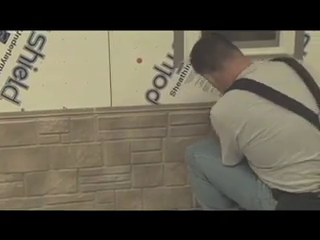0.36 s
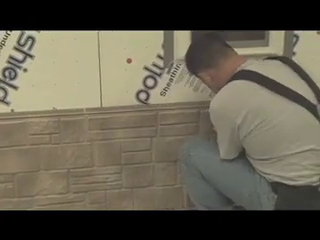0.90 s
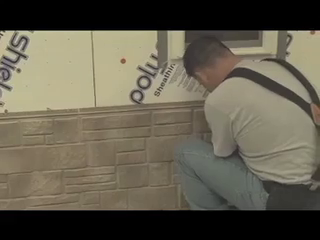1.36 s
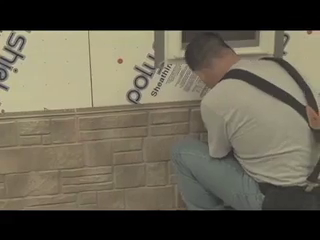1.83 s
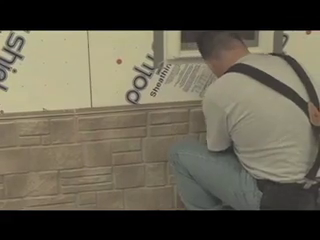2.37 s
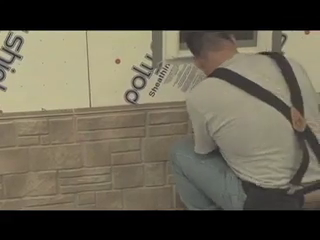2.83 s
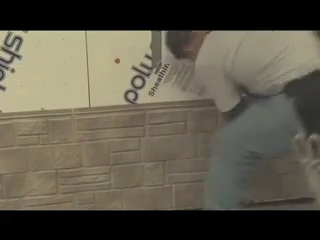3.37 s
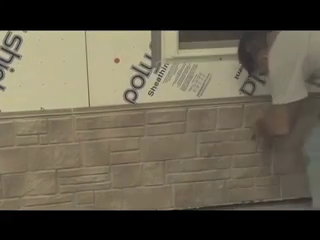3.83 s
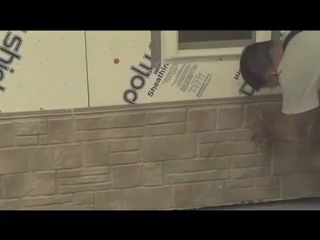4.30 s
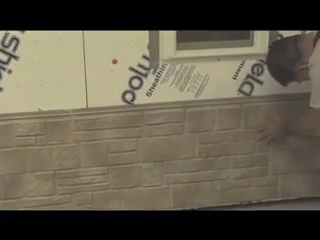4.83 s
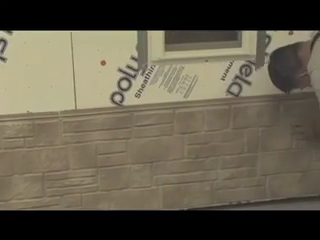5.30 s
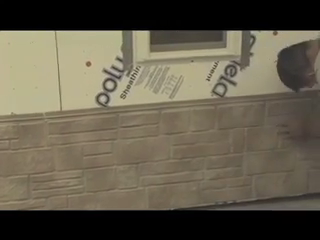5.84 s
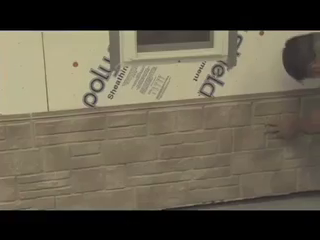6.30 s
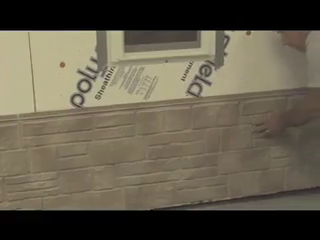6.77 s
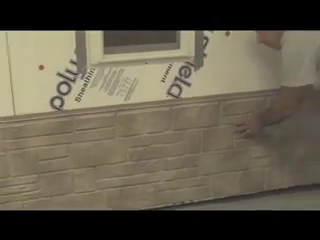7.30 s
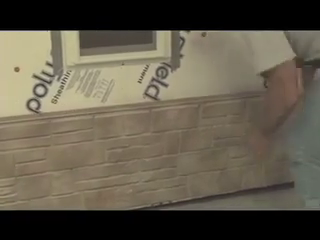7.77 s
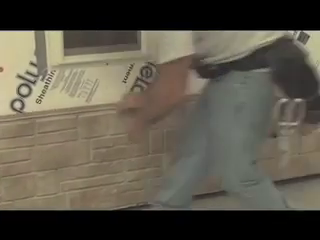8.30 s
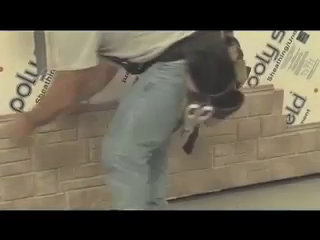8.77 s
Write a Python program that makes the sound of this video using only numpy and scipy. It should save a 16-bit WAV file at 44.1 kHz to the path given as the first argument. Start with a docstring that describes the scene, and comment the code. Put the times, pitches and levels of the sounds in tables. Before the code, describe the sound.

In a bare, reverberant room, the tail of a hammer blow fades over a faint low rumble. Single hard cracks with a hollow wall boom follow at uneven gaps, some preceded by a softer panel touch. Boots and clothes shuffle and scrape between them, with small tool knocks and metal clinks. Dry tripod ticks sound close to the microphone, clustering near the end, before a last shuffle.

```python
"""Hammer blows crack, boom in a panelled wall and ring on in a bare workshop, the first already dying away.
Between them come shuffling, small knocks, metal clinks, dry tripod ticks and a far steady rumble.
Struck things are sums of dying sines, rattle is a short noise burst, and the room is noise decaying band by band.
Friction is grainy shaped noise with a climbing rasp; the air handling is steady shaped noise.
A microphone colours the sum, a gain control ducks the loud parts and a soft limiter rounds the peaks."""
import sys
import numpy as np
from scipy import signal
from scipy.io import wavfile
from scipy.ndimage import uniform_filter1d

SR = 44100
rng = np.random.default_rng(int(sys.argv[2]) if len(sys.argv) > 2 else 0)


def wav_out(sig):
    """Save sig, one row per channel (or a flat mono array), as 16-bit PCM at SR to the path in sys.argv[1]."""
    wavfile.write(sys.argv[1], SR, np.round(np.clip(np.atleast_2d(sig).T, -1, 1) * 32767).astype(np.int16))


def linear_from_db(decibels):
    """Turn decibels (scalar or array-like) into linear amplitude factors; 0 gives 1."""
    return 10 ** (np.asarray(decibels, float) / 20)


N = 392472
LEAD = SR // 2  # samples computed ahead of time zero, for the blow that precedes it

# Far air handling. Each row: frequency in Hz, relative spectrum in dB.
AIR_SPECTRUM = [(12, -49.5), (20, -1.5), (43, -1.5), (145, -4), (167, -7.5), (192, -5.5), (220, -12),
                (342, -15.5), (438, -23), (476, -24), (760, -29), (3100, -33.5), (5530, -53), (13000, -56),
                (14500, -75)]
# Strokes of boots, knees and clothes. Each row: start in seconds, length in seconds,
# scrape level in dB, cloth hiss level in dB, low shuffle level in dB.
STROKES = [(0.316, .13, -63, -71, -57), (0.581, 0.092, -78, -79, -58.5), (0.832, 0.036, -56, -83, -44),
           (0.909, 0.096, -55, -72, -47.5), (1.15, 0.1, -66, -76.5, -51.5), (2.597, 0.077, -56.5, -77, -61),
           (2.75, 0.068, -61.5, -66.5, -60), (2.848, 0.11, -62.5, -78, -54.5),
           (3.047, 0.23, -59, -70.5, -62), (3.222, 0.047, -48, -52, -66), (3.293, 0.1, -55, -67, -53.5),
           (3.38, 0.044, -49, -55, -61), (3.474, 0.073, -54.5, -65, -58), (3.57, 0.14, -60.5, -74, -52),
           (3.782, 0.081, -57.5, -72.5, -51.5), (3.839, 0.12, -39.5, -59.5, -53.5),
           (4.001, 0.073, -61, -82, -61.5), (4.93, 0.29, -44.5, -60, -44.5),
           (5.826, 0.074, -60, -75, -54.5), (6.009, 0.023, -60, -80, -58.5), (6.607, 0.23, -67, -69.5, -77),
           (7.169, 0.049, -70, -79, -58), (7.431, 0.16, -64.5, -72.5, -60), (8.282, 0.12, -55, -65, -49.5),
           (8.368, 0.21, -59.5, -64.5, -70), (8.477, .12, -57, -67, -47), (8.57, 0.243, -56, -64.5, -62),
           (8.736, 0.18, -61.5, -66, -69)]
# Scraping. Each row: frequency in Hz, relative spectrum in dB.
SCRAPE_SPECTRUM = [(530, -12.5), (900, -10.5), (1260, -3), (1630, -7.5), (1950, -1.5), (2170, -2),
                   (2330, -8), (2610, -3.5), (3320, -2.5), (4100, -7), (4480, -12), (5080, -15.5),
                   (5450, -22.5), (7500, -26.5), (9750, -63), (16500, -120)]
# Cloth hiss. Each row: frequency in Hz, relative spectrum in dB.
CLOTH_SPECTRUM = [(5000, -18.5), (7500, -18), (9500, -9.5), (11500, -5), (14000, -10.5)]
# Low shuffle. Each row: frequency in Hz, relative spectrum in dB.
SHUFFLE_SPECTRUM = [(150, -29.5), (280, 6.5), (400, 2.5), (700, -7.5), (1200, -10), (2000, -56)]
# Slips of the tripod head. Each row: time in seconds, peak in dB.
TRIPOD_SLIPS = [(0.346, -36.5), (0.3636, -37), (0.381, -41), (0.402, -39), (0.439, -42), (0.52, -42.5),
                (0.7087, -40.5), (0.739, -41), (0.7977, -40), (0.877, -44), (5.3185, -39), (6.788, -35),
                (7.0116, -40), (7.0748, -38), (7.1368, -36.5), (7.1808, -38), (7.219, -37), (7.243, -42),
                (7.2743, -35), (7.303, -35), (7.3213, -39), (7.34, -39), (7.361, -42), (7.389, -39.5),
                (7.423, -39), (7.5, -36), (7.555, -36), (7.6115, -37), (7.675, -36.5), (7.725, -36.5),
                (7.776, -37.5), (7.8995, -34.5)]
# Modes of the camera body. Each row: mean frequency in Hz, relative level in dB, t60 in seconds.
CAMERA_BODY_MODES = [(720, -11, .006), (1010, -3, 0.0092), (1290, -13.5, 0.048), (1390, 8.5, 0.0062),
                     (1800, -4.5, 0.0058), (2280, -1.5, 0.0091), (2800, -9, .005), (3800, -18, .005)]
# Small knocks of tools and boots. Each row: time in seconds, ring peak in dB, ring frequency in Hz,
# rattle re ring in dB, room tail re ring in dB.
SMALL_KNOCKS = [(0.833, -45, 1290, 4.5, -15), (1.158, -51, 1240, -4, -14.5), (1.204, -50.5, 1860, 0, -13),
                (2.654, -42.5, 3200, -15, -13.5), (2.76, -48, 3240, -4, -29), (2.8714, -53.5, 1135, 4, -7),
                (3.2127, -30, 2460, -1, -10.5), (3.3809, -37, 2310, 3.5, -9.5),
                (3.469, -44, 1500, 4, -11.5), (3.7339, -45, 3800, 2.5, -9), (3.7977, -51.5, 1070, -9, -20),
                (5.777, -55, 1480, 2, -7), (5.8409, -47, 1800, 2.5, -9), (5.9282, -50, 1810, 2, -6.5),
                (6.019, -66, 1075, -3, -7), (6.078, -51, 3300, 5, -21.5), (8.2866, -45, 1150, 4, -6.5),
                (8.441, -49, 3880, -3, -8), (8.516, -45.5, 1250, -4, -10), (8.6045, -50, 1080, -1, -3),
                (8.6916, -53, 2510, 9, -6)]
# Bright metal clinks. Each row: time in seconds, peak in dB, frequency in Hz, t60 in seconds.
METAL_CLINKS = [(2.662, -58, 3180, 0.22), (2.761, -53, 3070, 0.19), (2.76, -64, 8200, 0.13),
                (8.288, -44.5, 5000, 0.014), (8.29, -44, 4050, 0.06), (8.345, -54, 4100, .08),
                (8.45, -51, 4000, 0.072), (8.69, -49, 3980, .03), (8.694, -50, 2450, 0.18),
                (3.226, -44, 11400, .02), (3.247, -52, 11000, .02), (3.266, -48, 12000, .02),
                (3.414, -42, 11600, 0.0091), (8.356, -60, 10000, .04)]
# Hammer meeting the loose panel and pushing it flat. Each row: time in seconds, rattle level in dB,
# thud peak in dB.
PANEL_TOUCHES = [(1.5452, -29.5, -21.5), (2.2455, -30.5, -9.5), (4.173, -28, -10), (4.7072, -26.5, -19),
                 (5.3883, -27, -23), (6.099, -22.5, -21.5)]
# Hammer blows. Each row: time in seconds, crack level in dB, most driven pitch in Hz,
# wall boom peak in dB, room tail level in dB.
HAMMER_BLOWS = [(-.12, -3, 3000, -4, -20), (1.5552, -5.5, 2640, -13, -18.5),
                (1.5889, -10, 3400, -16, -35.5), (2.2504, -3, 2475, -14.5, -13),
                (4.1808, -2.5, 3450, -4.5, -15.5), (4.7154, -2.5, 3585, -8.5, -14.5),
                (5.3948, -7.5, 4170, -4.5, -13), (6.1053, -1.5, 2500, -14, -15.5)]
# Wall and panel modes. Each row: mean frequency in Hz, relative level in dB, t60 in seconds.
WALL_MODES = [(181.5, -2, .15), (215, -3.5, 0.097), (260, -1, 0.075), (337, -0.5, 0.11), (399.2, 8, 0.085),
              (490, -10, 0.015), (697, -2.5, 0.05), (825, 1, 0.026), (1128, -0.5, 0.065),
              (1292, -11, 0.032)]
# Hammer face and panel skin modes. Each row: mean frequency in Hz, level in dB before the pitch
# weighting, t60 in seconds.
CRACK_MODES = [(1290, 4.5, 0.064), (1760, -4.5, .015), (2210, -3.5, 0.021), (2574, -1.5, 0.022),
               (3160, -3, 0.005), (3450, -7, 0.017), (3480, 1, 0.016), (4150, -1.5, 0.014),
               (5560, -8.5, 0.0066)]
# Rattle at impact, before tilt. Each row: frequency in Hz, relative spectrum in dB.
RATTLE_SPECTRUM = [(180, -37.5), (300, -8.5), (904, -5.5), (1210, 1), (1570, -13), (2210, 1), (3590, 3),
                   (7580, -24), (8490, -20), (13400, -17), (14500, -36)]
# Echoes off the floor and near walls. Each row: delay in seconds, gain in dB.
NEAR_ECHOES = [(.0035, -11.5), (.0062, -8), (0.01, -14.5), (0.0112, -9), (0.02, -15.5), (0.0209, -16.5)]
# Room tail, before tilt. Each row: frequency in Hz, relative spectrum in dB.
TAIL_SPECTRUM = [(35, -32.5), (60, -11), (157, -2.5), (222, -7.5), (403, 0.5), (596, -7), (733, -3),
                 (803, -11), (1080, -8), (2210, -14), (3110, -14), (5040, -25.5), (6950, -38), (13200, -29),
                 (14500, -55)]
# Room decay. Each row: frequency in Hz, t60 in seconds.
ROOM_T60 = [(100, 0.65), (260, 0.59), (700, 0.48), (1840, 0.44), (4850, 0.46), (12800, 0.37)]
# Resonances and dips of the microphone in its housing. Each row: frequency in Hz, width in Hz, gain in dB.
MICROPHONE_RESONANCES = [(4600, 400, -3), (5150, 300, 6), (5800, 300, 3), (7200, 1200, -3), (8600, 400, 3),
                         (9400, 500, -2)]


def evened(x):
    """Scales to rms 1."""
    return x / np.sqrt(np.mean(x ** 2) + 1e-20)


def read(points, hz):
    """Interpolates a table on a log-frequency axis."""
    f, value = np.transpose(points)
    return np.interp(np.log(hz + 1), np.log(f + 1), value)


def add(mix, start_s, sound):
    """Mixes a sound in at start_s; the mix begins LEAD samples early."""
    part = mix[LEAD + round(start_s * SR):][:len(sound)]
    part += sound[:len(part)]


def tilted(spectrum, bass_db, treble_db, low_hz=110, bass_hz=750, treble_hz=4600):
    """Lifts or cuts the boom region and the treble of a spectrum table."""
    rows = []
    for hz, db in spectrum:
        bass = bass_db / (1 + (hz / bass_hz) ** 2) / (1 + (low_hz / hz) ** 2)
        treble = treble_db / (1 + (treble_hz / hz) ** 4)
        rows.append((hz, db + bass + treble))
    return rows


def noise(spectrum, count, size=512, patchy_db=0., t60_table=None):
    """Shaped noise of rms 1 from random short-time spectra, with drifting patches and optional decay per band."""
    frames, hop = count * 4 // size + 5, size // 4
    hz = np.fft.rfftfreq(size, 1 / SR)
    real, imag, patches = rng.standard_normal((frames, len(hz), 3)).T
    patches = uniform_filter1d(patches, size=6, axis=0)  # across frequency
    patches = evened(uniform_filter1d(patches, size=10, axis=1))  # along time
    db = read(spectrum, hz)[:, None] + patchy_db * patches
    if t60_table:
        frame_s = np.arange(frames) * hop / SR
        db = db - 60 * frame_s / read(t60_table, hz)[:, None]
    wave = signal.istft((real + 1j * imag) * linear_from_db(db), nperseg=size, noverlap=size - hop)[1]
    return evened(wave[:count])


def resonate(x, hz, width_hz):
    """Moving resonance of gain 1: shifts the curve hz down to zero, smooths, shifts back."""
    turn = np.exp(2j * np.pi * np.cumsum(hz) / SR)
    pole = np.exp(-np.pi * width_hz / SR)
    return 2 * (turn * signal.lfilter([1 - pole], [1, -pole], x / turn)).real


def ring(modes, spread, rise_s):
    """Struck body: dying sines, each randomly retuned by the fraction spread and signed; peak 1."""
    t = np.arange(SR // 5) / SR
    hz, db, t60_s = np.transpose(modes)[:, :, None]
    tune, sign = rng.standard_normal((2, len(modes), 1))
    sines = np.sin(2 * np.pi * hz * (1 + spread * tune) * t)
    out = (np.sign(sign) * linear_from_db(db - 60 * t / t60_s) * sines).sum(0)
    out = out * (1 - np.exp(-t / rise_s))
    return out / abs(out).max()


def snap(t60_s, treble_db, rise_s):
    """Wideband rattle: noise that starts sharply and dies fast."""
    t = np.arange(SR // 5) / SR
    rattle = noise(tilted(RATTLE_SPECTRUM, 0, treble_db), len(t), size=256)
    return rattle * linear_from_db(-60 * t / t60_s) * (1 - np.exp(-t / rise_s))


def reverb(bass_db, treble_db):
    """Room tail: fills within a few ms, decays band by band; the far wall answers in a soft swell."""
    t = np.arange(SR) / SR
    tail = noise(tilted(TAIL_SPECTRUM, bass_db, treble_db), SR, patchy_db=1.13, t60_table=ROOM_T60)
    tail = tail / np.sqrt(np.mean(tail[:SR // 20] ** 2))  # rms 1 over the first 50 ms
    far_wall = linear_from_db(2.0 * np.exp(-((t - .09) / 0.03) ** 2))
    return tail * (1 - np.exp(-t / 0.0038)) * far_wall


def air_handling():
    """Far rumble: steady noise, strongest in the bass, with slow patches."""
    return linear_from_db(-45.5) * noise(AIR_SPECTRUM, N, size=2048, patchy_db=2.0)


def shuffling():
    """Grainy friction: uneven grit roughens scrape, cloth and shuffle; firm scrapes rasp at a climbing pitch."""
    peak_at, edge_db, trail_db_per_s = 0.35, -8, -240  # a stroke swells, sinks and trails off in the room
    rasp_start_hz, rasp_climb, rasp_max_db, rasp_half_at_db = 1890, 0.49, 6, -40.5
    out, t = np.zeros(N + LEAD), np.arange(SR // 2) / SR
    for start_s, length_s, scrape_db, cloth_db, shuffle_db in STROKES:
        along = np.minimum(t / length_s, 1)
        off_peak = np.where(along < peak_at, 1 - along / peak_at, (along - peak_at) / (1 - peak_at))
        trail_db = trail_db_per_s * np.maximum(t - length_s, 0)
        stroke = linear_from_db(edge_db * off_peak ** 2.4 + trail_db) * np.minimum(t / 0.0026, 1)
        grains = uniform_filter1d(rng.exponential(1, len(t)) - 1, size=120)
        grit = evened(linear_from_db(1.7 * evened(grains)))
        scrape = noise(SCRAPE_SPECTRUM, len(t), patchy_db=1.0)
        cloth = noise(CLOTH_SPECTRUM, len(t), patchy_db=1.0)
        shuffle = noise(SHUFFLE_SPECTRUM, len(t), patchy_db=1.0)
        rasp_gain = linear_from_db(rasp_max_db) / (1 + linear_from_db(rasp_half_at_db - scrape_db))
        rasp_hz = rasp_start_hz * (1 + rasp_climb * along ** 2)
        scrape = evened(scrape + rasp_gain * resonate(scrape, rasp_hz, width_hz=300))
        layers = linear_from_db(scrape_db) * scrape + linear_from_db(cloth_db) * cloth + linear_from_db(shuffle_db) * shuffle
        add(out, start_s, layers * grit * stroke)
    return out


def tripod():
    """Each slip of the turning head rings the camera body, close and dry."""
    out = np.zeros(N + LEAD)
    for time_s, peak_db in TRIPOD_SLIPS:
        add(out, time_s - .0008, linear_from_db(peak_db) * ring(CAMERA_BODY_MODES, 0.019, 0.0015))
    return out


def handling():
    """Knocks of tools and boots: one mode, rattle and room tail; metal clinks: one dry mode each."""
    out = np.zeros(N + LEAD)
    for time_s, peak_db, hz, rattle_db, room_db in SMALL_KNOCKS:
        body = ring([(hz, 0, 0.032)], 0, .0004)
        rattle = linear_from_db(rattle_db) * snap(0.046, -16.5, 0.00085)
        add(out, time_s, linear_from_db(peak_db) * (body + rattle))
        add(out, time_s, linear_from_db(peak_db + room_db) * reverb(-9.0, -1.8))
    for time_s, peak_db, hz, t60_s in METAL_CLINKS:
        add(out, time_s, linear_from_db(peak_db) * ring([(hz, 0, t60_s)], 0, .0005))
    return out


def near_echoes(crack):
    """Adds delayed copies of the crack from the floor and near walls."""
    taps = np.zeros(SR // 20)
    taps[0] = 1
    for delay_s, gain_db in NEAR_ECHOES:
        taps[round(delay_s * SR)] = linear_from_db(gain_db)
    return signal.oaconvolve(crack, taps)[:N + LEAD]


def hammer():
    """Touches and blows: cracking hammer face and panel skin, booming wall, near echoes and room tail."""
    boom_rise_s = 0.0029
    tail_bass_per_boom_db, usual_boom_re_crack_db = 0.96, -2.5  # a boomier blow has a darker tail
    crack, boom, wet = np.zeros((3, N + LEAD))
    for time_s, rattle_db, thud_db in PANEL_TOUCHES:
        add(crack, time_s, linear_from_db(rattle_db) * snap(0.11, -5.0, 0.00043))
        add(boom, time_s, linear_from_db(thud_db) * ring(WALL_MODES, 0.022, boom_rise_s))
    for time_s, crack_db, pitch_hz, boom_db, room_db in HAMMER_BLOWS:
        # modes near the pitch of the blow are driven hardest: 14 dB less per octave away
        driven = [(hz, db - 14 * abs(np.log2(hz / pitch_hz)), t60_s) for hz, db, t60_s in CRACK_MODES]
        rattle = linear_from_db(-1.5) * snap(0.037, -0.5, 0.00087)
        add(crack, time_s, linear_from_db(crack_db) * (ring(driven, 0.0066, 0.00011) + rattle))
        add(boom, time_s - .001, linear_from_db(boom_db) * ring(WALL_MODES, 0.013, boom_rise_s))
        tail_bass_db = tail_bass_per_boom_db * (boom_db - crack_db - usual_boom_re_crack_db)
        add(wet, time_s, linear_from_db(room_db) * reverb(tail_bass_db, 0.6))
    return near_echoes(crack) + boom + wet


def scene():
    """All sources over the steady rumble, one channel."""
    air = air_handling()
    events = hammer() + handling() + tripod() + shuffling()
    return (air + events[LEAD:])[None]


def microphone(dry):
    """Resonances and dips of the microphone in its housing, with a band limit."""
    band_limit_hz = 14000
    hz = np.linspace(0, SR / 2, num=1025)
    colour_db = sum(db / (1 + (2 * (hz - f) / width) ** 2) for f, width, db in MICROPHONE_RESONANCES)
    taps = signal.firwin2(511, hz, linear_from_db(colour_db) * (hz < band_limit_hz), window=("kaiser", 7), fs=SR)
    return signal.oaconvolve(dry, taps[None], "same")


def gain_control(heard):
    """Turns down sound above a threshold after a short lag, then recovers steadily."""
    threshold_db, cut_per_db, lag_s = -23, 0.33, 0.0099
    power = signal.lfilter([1 / 220], [1, 1 / 220 - 1], heard[0] ** 2)  # 220 samples, 5 ms
    power_db = 10 * np.log10(power + 1e-12)
    fall_db = np.arange(N) * 60.0 / SR  # the held level falls 60 dB per second
    held_db = np.maximum.accumulate(power_db + fall_db) - fall_db
    over_db = np.maximum(held_db - threshold_db, 0)
    step = 1 / (lag_s * SR)
    return heard / linear_from_db(cut_per_db * signal.lfilter([step], [1, step - 1], over_db))


def low_pass(x):
    """Removes everything above the highest recorded frequency."""
    return signal.sosfilt(signal.butter(12, 14800, fs=SR, output="sos"), x)


def record(dry):
    """Microphone, gain control and soft overload at 0.97 of full scale."""
    ducked = gain_control(microphone(dry))
    soft = ducked / (1 + abs(ducked / .97) ** 5) ** (1 / 5)
    return low_pass(soft)


dry = scene()
out = record(dry)
wav_out(out)
```